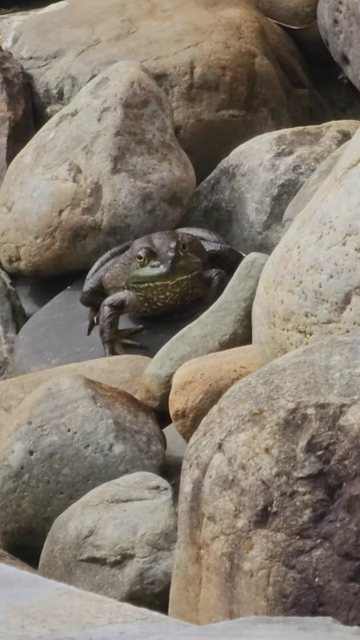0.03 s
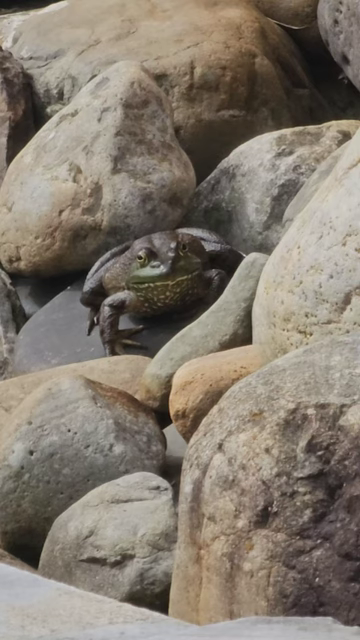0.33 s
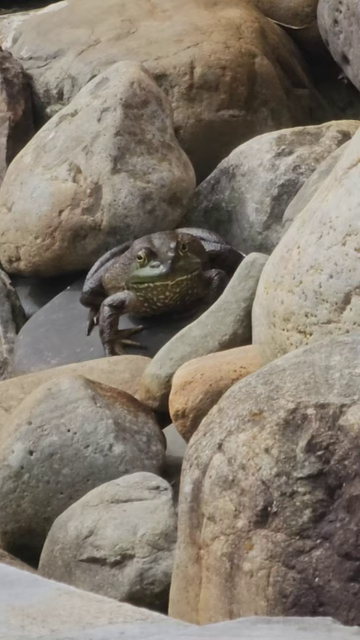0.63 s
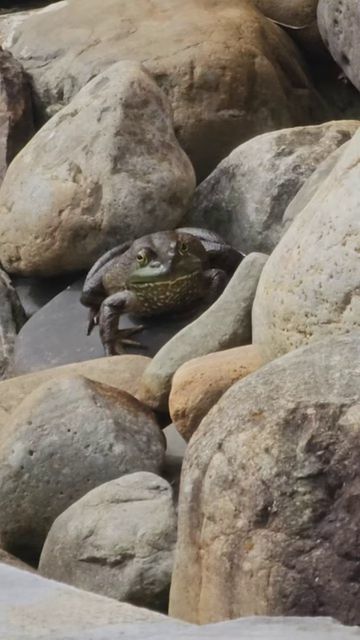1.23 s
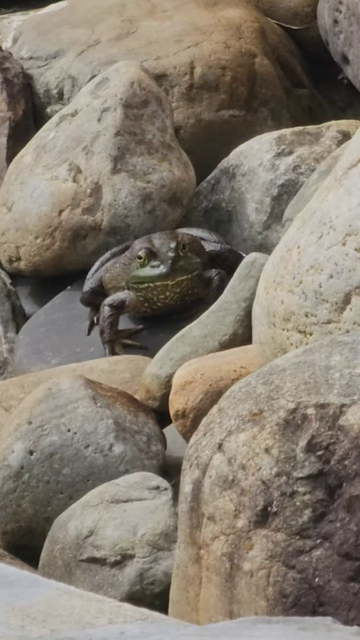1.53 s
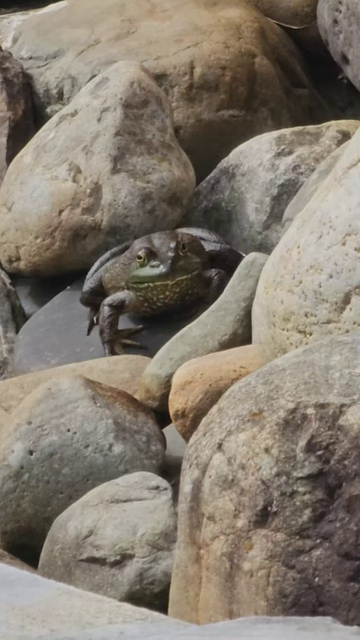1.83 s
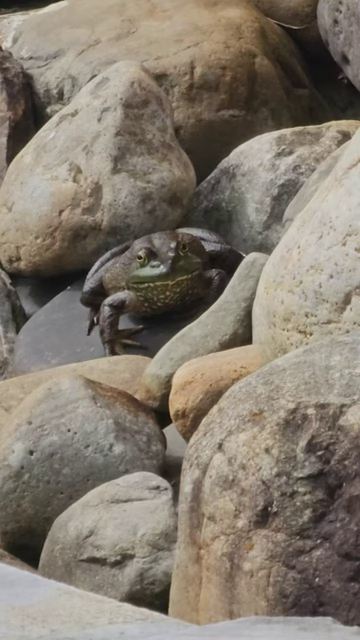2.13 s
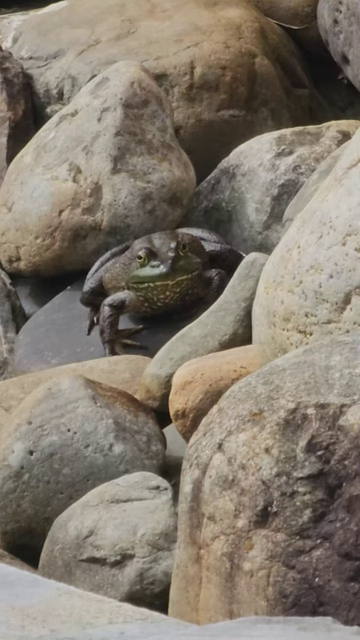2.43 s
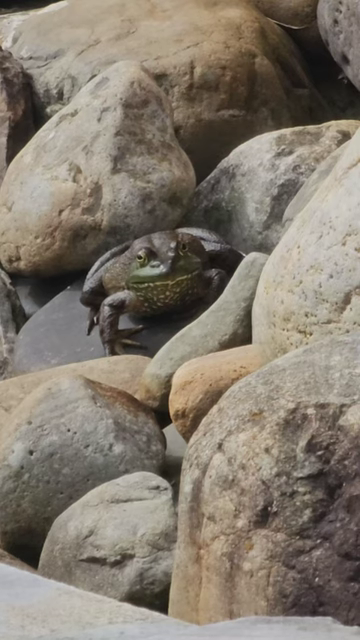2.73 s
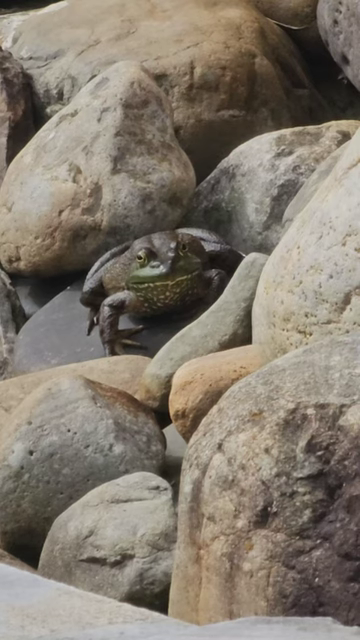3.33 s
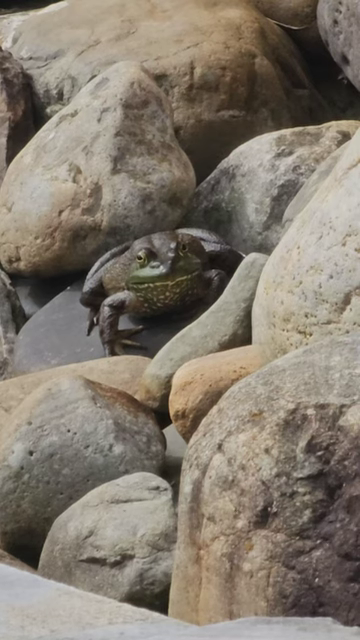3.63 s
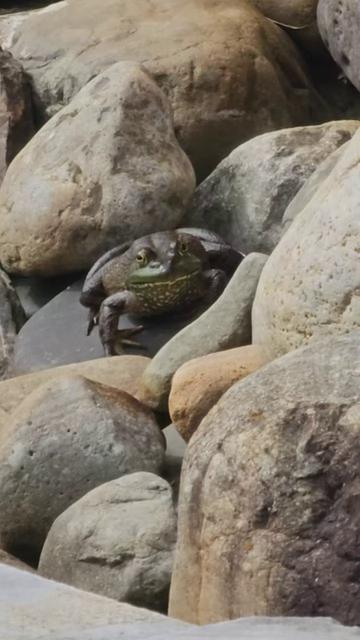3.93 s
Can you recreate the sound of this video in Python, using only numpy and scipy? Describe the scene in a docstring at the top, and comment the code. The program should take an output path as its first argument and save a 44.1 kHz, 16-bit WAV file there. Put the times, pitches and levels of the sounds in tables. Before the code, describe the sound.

Small birds whistle sweeping chirps outdoors, with two low gulps over a faint rumble.

```python
"""A small bird whistles sweeping notes across a rocky pond, then a nearer, louder one sings.
Another steps down the scale and a distant flock chatters. Each note is one sliding tone,
scattered by the stones. Two low gulps, probably from a frog, swell quickly and echo.
Soft plops, scuffs, sizzles and a tick dot the scene. A low rumble and faint hiss, both made
of noise, lie underneath, and a far drone of stacked tones winds up late."""
import sys
import numpy as np
from scipy import signal
from scipy.fft import rfft, irfft
from scipy.io import wavfile
from scipy.ndimage import uniform_filter1d

SR = 44100
rng = np.random.default_rng(int(sys.argv[2]) if len(sys.argv) > 2 else 0)


def put_to_file(sound):
    """Save the sound as 16-bit audio at rate SR, in the file named by the first command-line argument."""
    columns = np.atleast_2d(sound).T  # one column per channel
    safe = np.clip(columns, -1, 1)
    whole_steps = np.round(safe * 32767)
    wavfile.write(sys.argv[1], SR, whole_steps.astype(np.int16))


N = 176400  # 4 seconds

# Each song has one list per note. Each row: time in seconds, pitch in Hz, relative level in dB.
NEAR_NOTES = [
    [(1.682, 3220, -42), (1.708, 2740, -32.5), (1.728, 2597, -32.5), (1.742, 2440, -42)],
    [(1.753, 2590, -52), (1.767, 3017, -29), (1.80, 2862, -33), (1.845, 2777, -26), (1.858, 2840, -33.5)],
    [(1.975, 2900, -35.5), (1.986, 3450, -33), (1.999, 3570, -31.5), (2.006, 3430, -22),
     (2.019, 3170, -19.5), (2.038, 2794, -25)],
    [(2.128, 2946, -31.5), (2.137, 3377, -29), (2.153, 3300, -21.5), (2.17, 2990, -21.5),
     (2.192, 2758, -27.5)],
    [(2.29, 3080, -49), (2.312, 2802, -26), (2.345, 2270, -32.5), (2.375, 2000, -40.5), (2.43, 1925, -39)],
    [(2.541, 2780, -47), (2.562, 2450, -31.5), (2.58, 2400, -34), (2.597, 2400, -45), (2.635, 2400, -37)],
    [(2.638, 2440, -31), (2.657, 2270, -28.5), (2.685, 1870, -43), (2.742, 1830, -40)],
    [(2.812, 2816, -44.5), (2.835, 2450, -33), (2.875, 2416, -35.5), (2.92, 2356, -35)],
    [(2.933, 2340, -24.5), (2.948, 2240, -26.5), (2.976, 1800, -39.5), (3.008, 1765, -41)],
    [(3.25, 3410, -37.5), (3.281, 3235, -21.5), (3.291, 3660, -20), (3.303, 4010, -24), (3.319, 3940, -24),
     (3.337, 3590, -17), (3.358, 3515, -27)],
    [(3.468, 3440, -37), (3.487, 3280, -28.5), (3.511, 3130, -12.5), (3.524, 3545, -21.5),
     (3.538, 3880, -23), (3.557, 3360, -21), (3.585, 2955, -28), (3.62, 2740, -32.5), (3.665, 2720, -40)],
    [(3.778, 3335, -54), (3.812, 3290, -34.5), (3.842, 3286, -43)],
]
FAR_NOTES = [
    [(.085, 3560, -57), (.11, 3450, -41.5), (.121, 3294, -39.5), (.165, 3006, -37.5), (.182, 3035, -36.5)],
    [(.383, 3300, -51), (.398, 3020, -43.5), (.413, 2810, -45), (.424, 2200, -50), (.438, 1940, -58)],
    [(.455, 2750, -42.5), (.472, 2940, -40.5), (.50, 3057, -37.5), (.535, 3138, -43), (.572, 3165, -49.5)],
    [(.708, 3050, -46), (.732, 3016, -52), (.74, 3313, -44), (.753, 2880, -45), (.768, 2490, -58)],
    [(.818, 5050, -56), (.836, 4680, -35), (.853, 4170, -46), (.888, 3904, -37), (.918, 3790, -53),
     (.942, 3504, -38.5), (.972, 2950, -44.5), (.992, 2550, -52.5), (1.02, 1920, -52)],
]
FALLING_NOTES = [
    [(3.362, 3207, -38), (3.39, 3025, -46), (3.438, 2990, -45.5)],
    [(3.445, 2840, -44), (3.49, 2709, -46), (3.522, 2708, -39)],
    [(3.53, 2630, -39), (3.555, 2543, -42.5), (3.618, 2536, -40.5)],
    [(3.626, 2440, -49), (3.65, 2280, -45), (3.683, 2200, -49)],
    [(3.733, 2107, -48), (3.77, 2020, -44), (3.818, 1963, -49)],
]
# Far chirps. Each row: start and length in seconds, first and last pitch in Hz, relative level in dB.
CHIRPS = [(0.151, 0.11, 2600, 2374, -55.5), (0.261, 0.062, 3450, 3010, -51),
          (1.233, 0.033, 4900, 4070, -55), (1.378, 0.028, 4156, 3960, -53), (1.513, 0.025, 4500, 4030, -52),
          (1.629, 0.037, 4900, 3910, -48), (1.717, 0.027, 3600, 4270, -53), (1.89, 0.023, 3480, 4120, -50),
          (2.05, 0.039, 3700, 4740, -48), (2.231, 0.015, 3900, 4400, -50), (2.394, 0.032, 3700, 4900, -51),
          (2.465, 0.04, 2850, 2464, -48)]
def birds():
    """Three singers and scattered chirps; the farther the bird, the more of its sound is echo."""
    chirps = [[(s, first, db), (s + length, last, db)] for s, length, first, last, db in CHIRPS]
    return (from_db(-9) * outdoors(whistle(NEAR_NOTES), pan_db=3, rocks_db=-1.5, tail_db=-7)
            + from_db(-8) * outdoors(whistle(FAR_NOTES), pan_db=3, rocks_db=-1, tail_db=-4.5)
            + from_db(-8) * outdoors(whistle(FALLING_NOTES), pan_db=.5, rocks_db=-1.5, tail_db=-6)
            + from_db(-11.5) * outdoors(whistle(chirps), pan_db=3, rocks_db=2, tail_db=1))


# Overtones, the higher tones above a note. Each row: frequency in Hz, relative level in dB.
OVERTONE_COLOUR = [(3650, -2), (4100, -26), (4800, -32), (6200, -38.5), (7200, -37.5), (7800, -27),
                   (9600, -30.5), (11800, -27), (12800, -50), (15000, -38)]
# How the overtones rise and fall. Each row: time in seconds, added level in dB.
OVERTONE_BOOST = [(.5, 1), (1.8, -13), (2.1, -9.5), (2.35, -9), (2.6, -1), (3.0, -4.5), (3.55, 0)]
# How rough the whistles sound. Each row: time in seconds, amount from 0 to 1.
ROUGHNESS = [(.5, .2), (.9, .4), (1.8, .15), (2.35, .27), (2.95, .33), (3.3, .1)]
def whistle(notes, top_harmonic=6):
    """Each note is a sliding, nearly pure tone with overtones, a slight tremble and a rasp."""
    edge_s, glide_s = .005, .0049
    clear_hz, raspy_hz = 1900, 2300  # the lowest notes have no rasp
    out, waver, flutter_db = np.zeros(N), .0041 * drift(250), 3 * drift(150)
    bright, rasp = from_db(in_time(OVERTONE_BOOST)[0]), in_time(ROUGHNESS)[0]
    jitter, shimmer = rasp * drift(420), rasp * drift(420)
    for note in notes:
        s, hz, db = np.transpose(note)
        n = np.arange(max(int((s[0] - edge_s) * SR), 0), min(int((s[-1] + edge_s) * SR), N))
        t = n / SR
        pitch = uniform_filter1d(np.interp(t, s, hz), int(glide_s * SR)) * (1 + waver[n])
        rough = np.clip((pitch - clear_hz) / (raspy_hz - clear_hz), 0, 1)
        phase = 2 * np.pi * np.cumsum(pitch) / SR + rough * jitter[n]
        rougher_phase = phase + .4 * rough * jitter[n]
        overtones = sum(from_db(at_hz(OVERTONE_COLOUR, k * pitch)) * (k * pitch < SR / 2)
                        * np.sin(k * rougher_phase) for k in range(2, top_harmonic + 1))
        to_edge_s = np.minimum(t - t[0], t[-1] - t)
        fade = np.sin(np.pi / 2 * np.clip(to_edge_s / (2 * edge_s), 0, 1)) ** 2
        level = from_db(np.interp(t, s, db) + flutter_db[n]) * (1 + rough * shimmer[n])
        out[n] += np.sqrt(2) * fade * level * (np.sin(phase) + bright[n] * overtones)
    return out


# The gulps. Each row: start in seconds, pitch in Hz, level in dB.
GULP_NOTES = [(2.158, 368, -28), (3.186, 362.4, -27.5)]
# Their echoes off the stones. Each row: delay in seconds, level in dB compared with the gulp.
STONE_ECHOES = [(.022, -3), (.035, -2), (.054, -12.5), (0.077, -9)]
# Their rough, noisy body. Each row: frequency in Hz, relative level in dB.
GULP_COLOUR = [(200, -14), (270, 3.5), (370, -3.5), (480, -11), (620, -7), (690, -13)]
def gulps():
    """Probably a frog: a low note of a few cycles with a short rough body, repeated by echoes."""
    rise_s, body_s = .0049, .037
    t, tone, body = np.arange(N) / SR, np.zeros(N), np.zeros(N)
    for s, hz, db in GULP_NOTES:
        age = np.maximum(t - s, 0)
        swell = (age / rise_s * np.exp(1 - age / rise_s)) ** 2
        phase = 2 * np.pi * hz * age
        tone += from_db(db) * swell * (np.sin(phase) + from_db(-29) * np.sin(2 * phase))
        body += from_db(db - 12.5) * np.sqrt(age / body_s) * np.exp(1 - age / body_s)
    echoes = sum(from_db(db) * delayed(tone, delay) for delay, db in STONE_ECHOES)
    middle, side = from_db(-1.5) * tail(tone, fade_s=.64)
    return tone + echoes + body * noise(GULP_COLOUR) + middle + .27 * side * [[1], [-1]]


# How loud the flock is. Each row: time in seconds, level in dB.
FLOCK_LEVEL = [(.1, -57), (.3, -55.5), (.4, -65.5), (.58, -54), (.75, -67.5), (1.0, -56), (1.3, -62.5),
               (1.65, -56.5), (1.9, -62.5), (2.4, -67), (2.9, -68), (3.4, -61.5), (3.65, -56), (4.0, -69)]
def flock(per_second=45, low_hz=2708, high_hz=5204, chirp_s=.028, pitch_drop=.18):
    """Many far birds chirp downward at random, heard only through their echoes."""
    notes = []
    for when, height, length in rng.random((int(per_second * N / SR), 3)):
        start = when * (N / SR - 2 * chirp_s)
        hz = low_hz + height * (high_hz - low_hz)
        notes.append([(start, hz, 0), (start + chirp_s * (.5 + length), hz * (1 - pitch_drop), 0)])
    calls = whistle(notes, top_harmonic=1)
    scattered = rms_one(rocks(calls) + from_db(-4) * tail(calls))
    return from_db(in_time(FLOCK_LEVEL)[0]) * pan(3) * scattered


# The plops. Each row: loudest moment in seconds, pitch in Hz, level in dB.
PLOP_NOTES = [(0.349, 310, -44.5), (0.451, 226, -45), (1.958, 259, -39), (2.497, 318, -44.5)]
def plops(width_s=.0052):
    """Soft low blips, each a tone lasting only a few cycles."""
    t = np.arange(N) / SR
    return sum(from_db(db) * np.exp(-((t - s) / width_s) ** 2) * np.sin(2 * np.pi * hz * (t - s))
               for s, hz, db in PLOP_NOTES)


# Scuffs and sizzles. Each row: loudest moment in seconds, level in dB, length in seconds.
SCUFF_PUFFS = [(2.67, -62, .012), (3.183, -48.5, 0.049)]
SIZZLE_PUFFS = [(.55, -72, 0.17), (1.6, -72.5, 0.44)]
# Their tone colours. Each row: frequency in Hz, relative level in dB.
DRY_COLOUR = [(900, -8), (2000, 4), (3000, 5), (5000, 6.5), (7000, -25), (15000, -29)]
THIN_COLOUR = [(5800, 5), (7200, 2.5), (9000, -16), (12000, 1), (13500, -28)]
def scuffs_and_sizzles():
    """Noise swells and fades: short for the dry scuffs, longer and higher for the sizzles."""
    t, out = np.arange(N) / SR, np.zeros((2, N))
    for puffs, colour in (SCUFF_PUFFS, DRY_COLOUR), (SIZZLE_PUFFS, THIN_COLOUR):
        swells = sum(from_db(db) * np.exp(-(2 * (t - s) / length) ** 2) for s, db, length in puffs)
        out += swells * noise(colour)
    return out


# The tones in the tick. Each row: pitch in Hz, level in dB, seconds to fade by 60 dB.
TICK_TONES = [(1020, -44.5, 0.049), (13400, -57, .025), (15000, -62, .025)]
def tick(start_s=2.662):
    """A tiny knock with a glassy edge: three tones start together and die away fast."""
    age = np.maximum(np.arange(N) / SR - start_s, 0)
    return sum(from_db(db - 60 * age / fade_s) * np.sin(2 * np.pi * hz * age)
               for hz, db, fade_s in TICK_TONES)


# The drone's tones. Each row: full pitch in Hz, relative level in dB.
DRONE_TONES = [(264, -65.5), (328, -60), (388, -58), (444, -63.5), (511, -68.5), (655, -62), (770, -72)]
# How it winds up. Each row: time in seconds, share of full pitch, added level in dB.
WIND_UP = [(2.6, 0.54, -30), (2.75, 0.63, -14), (2.9, .78, -7), (2.95, 1, -3.5)]
def drone(flutter_db=3.5):
    """Perhaps a far engine: a faint stack of tones winds up and then holds, wavering."""
    speed, rise_db = in_time(WIND_UP)
    return sum(from_db(db + rise_db + flutter_db * drift(12))
               * wavering_tone(hz * speed, waver=.01085, per_second=20) for hz, db in DRONE_TONES)


# The hum's tones and the rumble's tone colour. Each row: frequency in Hz, relative level in dB.
HUM_TONES = [(49, -8.5), (101, -8.5)]
RUMBLE_COLOUR = [(20, 1.5), (33, -7.5), (48, -1.5), (68, 0), (85, -1.5), (108, -1.5), (128, -6.5),
                 (150, -16.5), (185, -28)]
# How the two swell together. Each row: time in seconds, level in dB.
RUMBLE_SWELL = [(.1, -41.5), (1.6, -41), (1.72, -35.5), (1.95, -43), (2.15, -39.5), (2.42, -35.5),
                (2.78, -36), (3.05, -39.5), (3.22, -36.5), (3.4, -35), (3.9, -34), (4.0, -39.5)]
def rumble():
    """Deep noise with a wavering hum inside it."""
    hum = sum(from_db(db) * wavering_tone(hz, waver=.0492, per_second=18) for hz, db in HUM_TONES)
    return from_db(in_time(RUMBLE_SWELL)[0]) * (.81 * noise(RUMBLE_COLOUR) + hum) * pan(.55)


# Tone colours of the rush and the hiss. Each row: frequency in Hz, relative level in dB.
RUSH_COLOUR = [(100, -30), (170, -9), (264, 1), (370, -5.5), (476, -12.5), (680, -46)]
HISS_COLOUR = [(450, -2.5), (700, 1), (1000, -2.5), (1350, 0), (1800, -9.5), (2800, -11), (4400, -14),
               (5400, -12.5), (6400, -29.5), (7800, -29), (8600, -23.5), (9600, -31.5), (15500, -24)]
# How each one swells. Each row: time in seconds, level in dB.
RUSH_SWELL = [(.1, -58.5), (.28, -62), (.37, -53.5), (.6, -56), (1.4, -59.5), (2.7, -60), (3.1, -54.5),
              (3.85, -52.5)]
HISS_SWELL = [(.1, -57), (1.4, -58.5), (2.5, -57), (3.1, -56), (3.7, -54), (4.0, -57.5)]
def background():
    """A far, low rush and an airy hiss, both wandering in level, join the rumble."""
    deep = rumble()
    rush = from_db(in_time(RUSH_SWELL)[0] + 3.4 * drift(7.6)) * noise(RUSH_COLOUR)
    hiss = from_db(in_time(HISS_SWELL)[0] + .5 * drift(8.2)) * noise(HISS_COLOUR) * pan(1.3)
    left, right = deep + rush
    return np.array([left, delayed(right, .00014)]) + hiss


# Echoes from the banks. Each row: delay in seconds, relative level in dB.
BANK_ECHOES = [(.075, -18), (0.131, -22), (.2, -30.5)]
def outdoors(x, pan_db, rocks_db, tail_db):
    """A call reaches the left ear just before the right, then its duller echoes follow."""
    direct = np.array([x, delayed(x, .00004)])
    # Stones and leaves return little treble.
    dull = signal.sosfilt(signal.butter(1, 5460, fs=SR, output="sos"), x)
    banks = sum(from_db(db) * np.array([delayed(dull, s + lag) for lag in rng.uniform(0, .000964, 2)])
                for s, db in BANK_ECHOES)
    return pan(pan_db) * (direct + banks + from_db(rocks_db) * rocks(dull) + from_db(tail_db) * tail(dull))


def rocks(x, count=14, spread_s=.032):
    """Quick echoes from nearby stones; the later ones are weaker."""
    out = np.zeros((2, N))
    for ear in out:
        for share, sign in zip(rng.random(count), rng.choice([-1, 1], count)):
            lag = 1 + int(share * spread_s * SR)
            ear[lag:] += sign * (1.5 - share) * x[:N - lag]
    return out / np.sqrt(count)


def tail(x, fade_s=.66):
    """A wash of echoes from all around, different at each ear, falling 60 dB in fade_s seconds."""
    t = np.arange(SR) / SR
    response = rng.standard_normal((2, SR)) * from_db(-60 * t / fade_s) * (1 - np.exp(-t / .0092))
    response /= np.sqrt(np.sum(response ** 2) / 2)
    return signal.fftconvolve(x[None], response, axes=1)[:, :N]


# How alike noise is at the two ears. Each row: frequency in Hz, likeness from 0 to 1.
EAR_LIKENESS = [(40, 0.94), (250, .93), (500, 0.55), (1000, 0.5), (2000, 0.015), (12000, 0.085)]
def noise(colour):
    """Stereo noise of a given tone colour, fading steeply beyond its lowest and highest rows."""
    hz = np.arange(N // 2 + 1) * SR / N + 1e-3
    edges = 1 / (1 + (colour[0][0] / hz) ** 8) / (1 + (hz / colour[-1][0]) ** 8) ** .5
    middle, side = rfft(rng.standard_normal((2, N))) * from_db(at_hz(colour, hz)) * edges
    alike = at_hz(EAR_LIKENESS, hz)
    return rms_one(irfft(np.sqrt(1 + alike) * middle + np.sqrt(1 - alike) * side * [[1], [-1]], N))


def wavering_tone(hz, waver, per_second):
    """A pure tone whose pitch wanders; waver is a share of the pitch."""
    pitch = hz * (1 + waver * drift(per_second))
    return np.sqrt(2) * np.sin(2 * np.pi * np.cumsum(pitch) / SR)


def drift(per_second):
    """A random wander of about 1 either way."""
    points = rng.standard_normal(int(per_second * N / SR) + 2)
    return np.interp(np.arange(N) / SR * per_second, np.arange(len(points)), points)


def from_db(db):
    """Turn decibels into a multiplier."""
    return 10 ** (np.asarray(db) / 20)


def rms_one(x):
    """Scale a sound to an average power of 1."""
    return x / np.sqrt(np.mean(x ** 2) + 1e-20)


def in_time(rows):
    """Join timed rows into one curve for each column after the time."""
    s, *columns = np.transpose(rows)
    return [np.interp(np.arange(N) / SR, s, c) for c in columns]


def at_hz(rows, hz):
    """Read between a table's frequencies, giving each octave equal room."""
    row_hz, value = np.transpose(rows)
    return np.interp(np.log(np.maximum(hz, 1)), np.log(row_hz), value)


def pan(db):
    """Multipliers that make the left ear db decibels louder than the right."""
    return from_db([[db / 2], [-db / 2]])


def delayed(x, s):
    """The same sound, s seconds later."""
    n = np.arange(N)
    return np.interp(n - s * SR, n, x, left=0)


def scene():
    """Everything heard at the pond."""
    return birds() + flock() + gulps() + plops() + scuffs_and_sizzles() + tick() + drone() + background()


def record(dry):
    """The sound opens after a short near-silence, and the highest treble is cut."""
    opening = from_db(in_time([(.078, -45), (.0873, 0)])[0])
    return signal.sosfilt(signal.cheby2(16, 70, 16360, fs=SR, output="sos"), dry * opening)


dry = scene()
out = record(dry)
put_to_file(out)
```